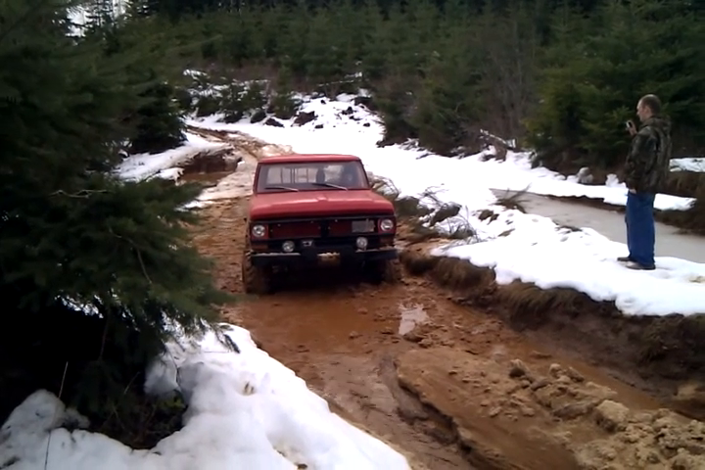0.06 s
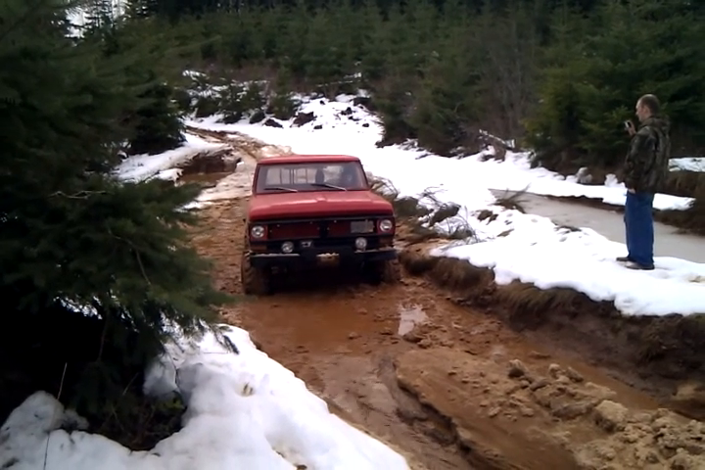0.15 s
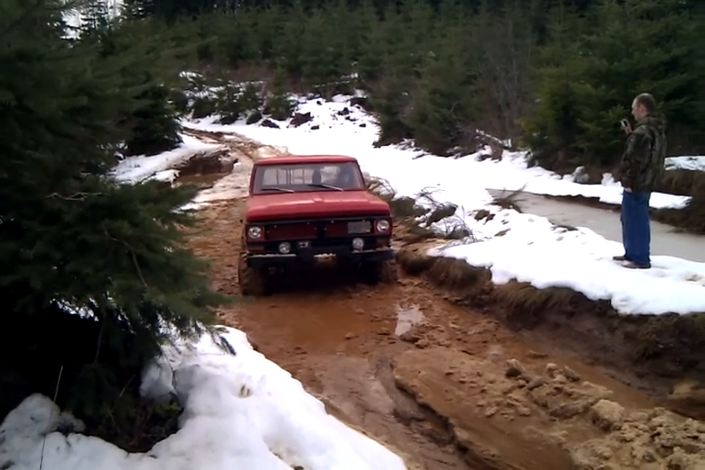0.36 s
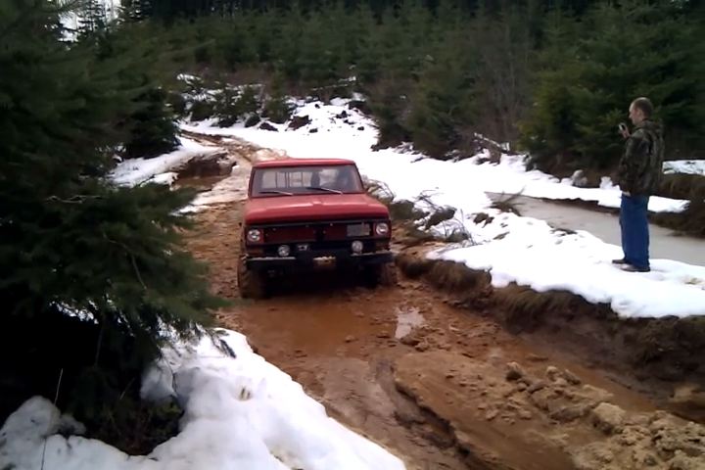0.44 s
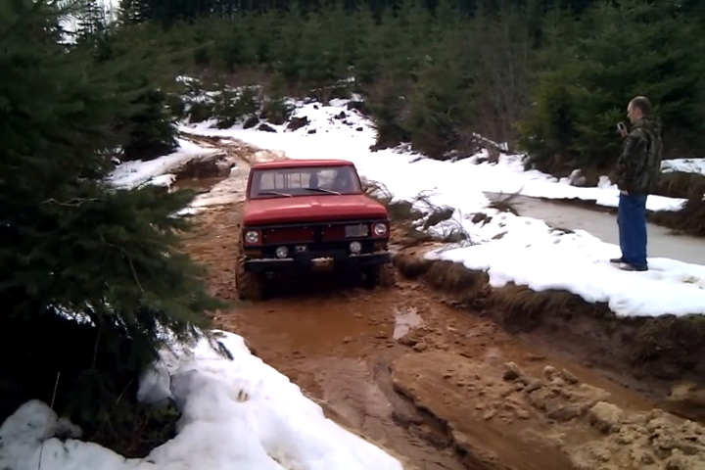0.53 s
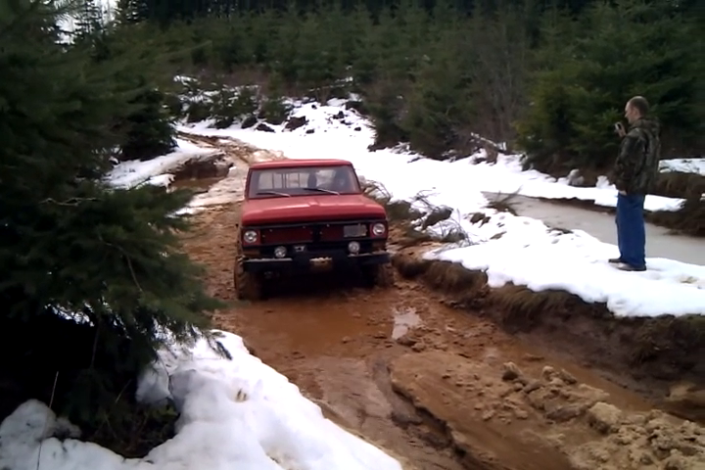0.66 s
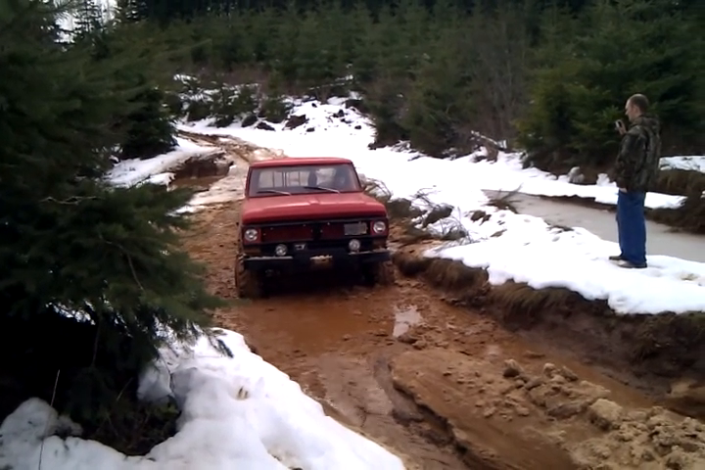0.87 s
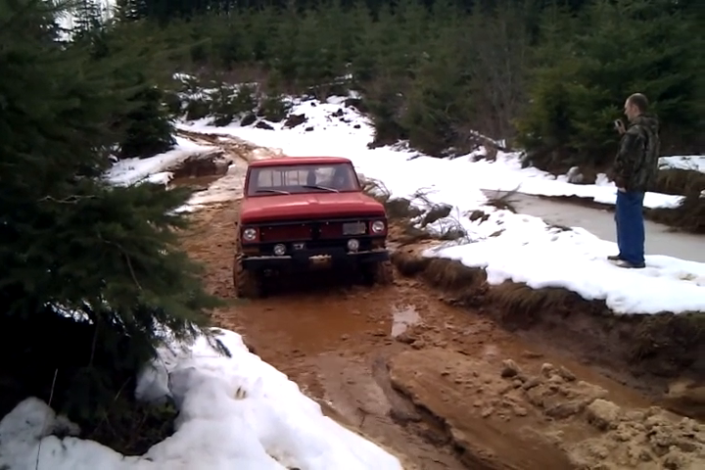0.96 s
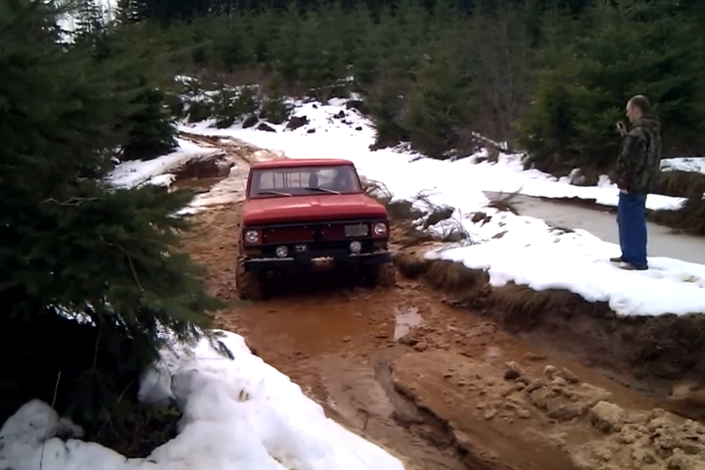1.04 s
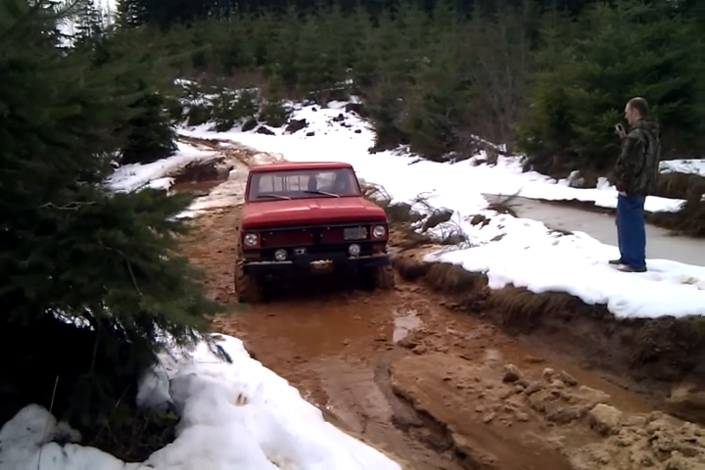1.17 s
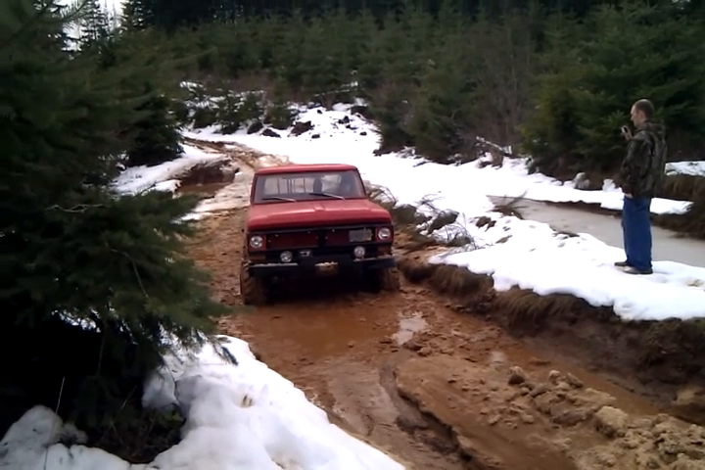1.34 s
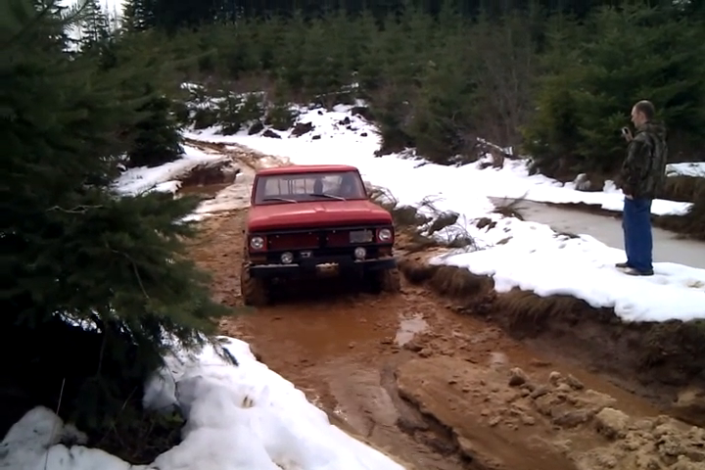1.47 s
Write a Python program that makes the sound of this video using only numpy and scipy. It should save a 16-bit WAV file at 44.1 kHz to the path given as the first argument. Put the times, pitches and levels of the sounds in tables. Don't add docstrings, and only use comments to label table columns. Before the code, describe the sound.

Truck engine starting: faint whine, a relay knock, then a metallic clash and rough settling

```python
import sys
import numpy as np
from scipy import signal
from scipy.fft import rfft, irfft
from scipy.io import wavfile
from scipy.ndimage import uniform_filter1d

SR = 44100
rng = np.random.default_rng(int(sys.argv[2]) if len(sys.argv) > 2 else 0)


def volts_from_decibels(level):
    exponent = np.asarray(level, float) / 20
    return 10 ** exponent


def to_wav(sig):
    pcm = np.clip(np.atleast_2d(sig), -1, 1) * 32767
    pcm = np.round(pcm).astype(np.int16)
    wavfile.write(sys.argv[1], SR, pcm.T)


N = 66150


def evened(x):
    return x / np.sqrt(np.mean(x ** 2) + 1e-20)


def curve(table, axis):
    rows = np.array(table, float)
    return np.interp(np.arange(N) / SR, rows[:, 0], rows[:, axis])


def drift(hz):
    width = max(int(SR / hz), 2)
    once = uniform_filter1d(rng.standard_normal(N), width)
    return evened(uniform_filter1d(once, width))


def add(mix, start_s, sound):
    part = mix[round(start_s * SR):][:len(sound)]
    part += sound[:len(part)]


def resonate(x, hz, width_hz):
    turn = np.exp(2j * np.pi * np.cumsum(hz * np.ones(len(x))) / SR)
    decay = np.exp(-np.pi * width_hz / SR)
    return 2 * (turn * signal.lfilter([1 - decay], [1, -decay], x / turn)).real


def shaped(x, points):
    hz, db = np.transpose(points)
    gain_db = np.interp(np.log(np.fft.rfftfreq(N, 1 / SR) + 1), np.log(hz + 1), db)
    return irfft(rfft(x) * volts_from_decibels(gain_db), N)


def pipe_note():
    # start_s, level_db, pitch_hz, roughness (0-1)
    note_path = [(0, -64, 223, 0.24), (.05, -35.5, 235.4, 0.31), (.21, -68, 225.6, 0.22),
                 (.305, -29.5, 232.8, 0.15), (.41, -28.5, 224.9, 0.15), (.44, -26.5, 241.9, 0.11),
                 (.55, -33.5, 229.9, 0), (.572, -15, 226.8, 0.09), (.612, -33.5, 236.1, 0.17),
                 (.775, -37.5, 238.5, 0.21), (.85, -23.5, 240.6, 0.1), (.97, -30, 233.3, 0),
                 (1.005, -33, 222, 0), (1.125, -31.5, 219.6, 0.15), (1.165, -44.5, 241.7, 0.37),
                 (1.26, -44, 244.7, 0.17), (1.345, -31, 231.8, 0), (1.5, -49.5, 209.6, 0.2)]
    # centre_s, length_s, change_db
    surges = [(0.237, .02, 20), (0.264, 0.023, 11), (0.341, .03, 0.5), (0.39, .015, 1.5),
              (0.414, 0.035, 5), (0.454, .03, 1), (0.521, 0.015, -5.5), (0.646, .025, 7.5),
              (0.664, .02, -14.5), (0.73, .025, 6.5), (0.794, .025, 9.5), (0.833, .015, -5),
              (1.03, .03, 3.5), (1.196, .03, 8.5), (1.391, .015, -20), (1.502, .025, 9)]
    note_width_hz, skirt_hz, skirt_db = 46, 130, -13.5
    wobble_db, overtone_db = 7, -25

    t = np.arange(N) / SR
    pitch_hz = curve(note_path, axis=2) * (1 + 0.011 * drift(33))
    rough = np.clip(curve(note_path, axis=3), 0, 1)
    phase = 2 * np.pi * np.cumsum(pitch_hz) / SR
    tone = evened(np.sin(phase) + volts_from_decibels(overtone_db) * np.sin(2 * phase))

    def pipe_noise(width_hz):
        narrow = resonate(rng.standard_normal(N), pitch_hz, width_hz)
        return evened(resonate(narrow, pitch_hz, 2 * width_hz))

    fuzz = pipe_noise(note_width_hz)
    skirt = pipe_noise(skirt_hz)
    surge_db = sum(db * np.exp(-((t - s) / length * 2) ** 2) for s, length, db in surges)
    wobble = wobble_db * np.sqrt(rough) * drift(75)
    level = volts_from_decibels(curve(note_path, axis=1) + surge_db + wobble)
    return level * (np.sqrt(1 - rough) * tone + np.sqrt(rough) * fuzz + volts_from_decibels(skirt_db) * skirt)


def shaken_body(drive, resonances):
    total = np.zeros(N)
    for hz, width_hz, db in resonances:
        mode = resonate(drive, hz * (1 + 0.032 * drift(14)), width_hz)
        mode = evened(resonate(mode, hz, 4 * width_hz))
        total += volts_from_decibels(db) * mode * volts_from_decibels(4.5 * drift(21))
    return evened(total)


def clatter():
    # start_s, clatter_db, low_body_db
    effort = [(0, -51, -1), (.3, -50, 6.5), (.38, -40, 4.5), (.43, -35.5, 3), (.455, -28, -5.5),
              (.52, -29.5, -2), (.555, -34.5, 8.5), (.582, -20.5, -2.5), (.66, -20, -14.5), (.7, -25.5, 1),
              (.735, -33.5, 3.5), (.822, -38, -1), (.99, -39, -4), (1.04, -36.5, 3), (1.082, -39.5, -5),
              (1.34, -41.5, -5), (1.38, -41.5, -1), (1.5, -42, -8.5)]
    # pitch_hz, width_hz, level_db
    tin = [(1110, 550, -9.5), (1912, 380, -2), (2200, 230, -9.5), (2430, 200, -5.5), (2980, 360, -13.5),
           (3420, 350, -12.5)]
    # pitch_hz, width_hz, level_db
    block = [(333, 140, -7), (504, 180, -3), (633.4, 110, -4), (780, 59, -8.5), (1026, 750, -3)]
    # frequency_hz, level_db
    rush_colour = [(60, -17), (300, -6), (900, -11), (1500, -10.5), (2300, 3), (3200, 0), (3700, -6),
                   (5000, -5)]
    ticks_per_s, tick_spread_db, hiss_share = 900, 3, 0.67
    tin_db, rush_db, rumble_db, rumble_hz = -4, 1.5, -12.5, 146

    strength = volts_from_decibels(tick_spread_db * np.minimum(rng.exponential(1, N), 4))
    ticks = strength * (rng.random(N) < ticks_per_s / SR)
    ticks = evened(ticks * np.sign(rng.standard_normal(N)))
    drive = (1 - hiss_share) * ticks + hiss_share * rng.standard_normal(N)

    upper = volts_from_decibels(tin_db) * shaken_body(drive, tin)
    lower = shaken_body(drive, block)
    rush = volts_from_decibels(rush_db) * evened(shaped(drive, rush_colour))
    rumble = evened(signal.lfilter(*signal.butter(2, rumble_hz, fs=SR), rng.standard_normal(N)))
    rumble = volts_from_decibels(rumble_db + 0.5 * drift(20)) * rumble
    low_weight = volts_from_decibels(curve(effort, axis=2))
    return volts_from_decibels(curve(effort, axis=1)) * (upper + rush + low_weight * (lower + rumble))


def ring(start_s, length_s, hz, db):
    width_hz, roughness = 90, 0.51
    t = np.arange(0, length_s, 1 / SR)
    fuzz = evened(resonate(rng.standard_normal(size=8000), hz, width_hz)[-len(t):])
    tone = np.sqrt(2) * np.sin(2 * np.pi * (hz * t + rng.random()))
    arch = np.sqrt(np.sin(np.pi * t / length_s))
    return start_s, volts_from_decibels(db) * arch * ((1 - roughness) * tone + roughness * fuzz)


def knock(hit_s, db, hz, rattle_s):
    thump_db, thump_s = -12.5, 0.00042
    top_hz, top_db = 3158, -13.5
    rattle_hz, rattle_db = 1800, -16

    t = np.arange(-200, 4000) / SR
    body = -np.exp(-(t / 0.00076) ** 2) * np.cos(2 * np.pi * hz * t)
    push = -volts_from_decibels(thump_db) * np.exp(-(t / thump_s) ** 2)
    top = volts_from_decibels(top_db) * np.exp(-(t / .002) ** 2) * np.cos(2 * np.pi * top_hz * t)

    jitter = evened(uniform_filter1d(rng.standard_normal(len(t)), size=90))
    loose = rng.standard_normal(len(t)) * volts_from_decibels(2 * jitter)
    loose = evened(resonate(resonate(loose, rattle_hz, 1600), rattle_hz, 2700))
    loose = loose * np.clip(1 + t / 0.0018, 0, 1) * np.clip((rattle_s - t) / .006, 0, 1)
    rattle = volts_from_decibels(rattle_db - 310 * t) * loose
    return hit_s + t[0], volts_from_decibels(db) * (body + push + top + rattle)


def whine():
    # pitch_hz, level_db
    partials = [(461, -53.5), (920.5, -52), (1841, -53.5), (2304, -76)]
    stop_s, fade_s = 0.36, 0.017
    t = np.arange(N) / SR
    turn = 2 * np.pi * np.cumsum(1 + .001 * drift(4.3)) / SR
    tone = sum(volts_from_decibels(db + 2.0) * np.sin(hz * turn + 6 * rng.random()) for hz, db in partials)
    return tone * np.clip((stop_s - t) / fade_s, 0, 1)


def air():
    # frequency_hz, level_db
    air_colour = [(60, -12.5), (400, -13), (1000, -3.5), (1700, 6), (2600, -4), (3600, -15.5), (5000, -14)]
    return volts_from_decibels(-50) * evened(shaped(rng.standard_normal(N), air_colour))


def scene():
    # start_s, length_s, pitch_hz, level_db
    scraped_parts = [(0.017, .02, 1660, -35), (.135, .02, 2620, -45), (0.19, .02, 1280, -39.5),
                     (0.266, 0.023, 1706, -33), (.425, .025, 1298, -33.5), (.5, .03, 1235, -34),
                     (.56, 0.033, 515, -15), (.57, .03, 1249, -19.5), (.572, .045, 3110, -16.5),
                     (0.449, .09, 3255, -37.5), (.595, 0.033, 621.6, -18), (.625, .027, 3395, -19.5),
                     (.635, .045, 2290, -19.5), (.645, .035, 1160, -20), (.655, 0.03, 1800, -19.5),
                     (.68, .03, 2380, -20.5), (.68, .03, 2082, -19.5), (.68, 0.062, 509.4, -26),
                     (0.842, .075, 2980, -38), (.88, 0.13, 795, -34.5), (0.866, 0.064, 605, -41.5),
                     (1.282, 0.14, 724.6, -43.5), (1.022, .05, 2200, -35), (1.032, .17, 780, -40.5),
                     (1.046, 0.11, 609.4, -44), (1.189, 0.024, 2430, -36), (1.243, .025, 2040, -45),
                     (1.256, .03, 2430, -39.5), (1.297, .07, 2350, -35.5)]
    # hit_s, peak_db, body_hz, rattle_s
    blows = [
        (0.1881, -29, 1460, .025),
        (0.2447, -23.5, 1910, 0),
        (0.2474, -11.5, 1184, 0.0447),
        (0.2518, -23, 1890, 0.0064),
        (0.582, -16.5, 690, .01),
        (0.5875, -21, 2567, 0),
        (.70, -17, 2300, 0.013),
    ]
    mix = pipe_note() + clatter() + whine() + air()
    for row in scraped_parts:
        add(mix, *ring(*row))
    for row in blows:
        add(mix, *knock(*row))
    return mix[None]


def roll_off(x):
    return signal.sosfilt(signal.butter(12, 15850, fs=SR, output="sos"), x)


def record(dry):
    # start_s, level_db, half_width_samples
    overloads = [
        (.5738, -43.5, 5),
        (.5831, -17, 2.5),
        (0.6005, -40.5, 4.5),
    ]
    block_s, patchy_db, block_db = .02, 0.88, 0.9
    low_hz, edge_hz = 60, 3260

    hz, t, z = signal.stft(dry[0], SR, nperseg=512, noverlap=384)
    block = (t / block_s).astype(int)
    patches = uniform_filter1d(rng.standard_normal(size=(200, 257)), size=4, axis=1)
    patches = evened(patches)[block].T
    whole = rng.standard_normal(size=200)[block]
    high = np.clip((hz[:, None] - 300) / 300, 0, 1)
    z = z * volts_from_decibels(high * (patchy_db * patches + block_db * whole))
    x = signal.istft(z, SR, nperseg=512, noverlap=384)[1][:N]

    x = signal.sosfilt(signal.butter(2, low_hz, "high", fs=SR, output="sos"), x)
    x = shaped(x, [(20, 0), (edge_hz, 0), (4000, -12), (4500, -33), (4800, -80), (22050, -100)])
    for start_s, db, half in overloads:
        dip = np.maximum(1 - (np.arange(-5, 6) / half) ** 2, 0)
        add(x, start_s, -volts_from_decibels(db) * dip)
    return roll_off(x[None])


dry = scene()
out = record(dry)
to_wav(out)
```